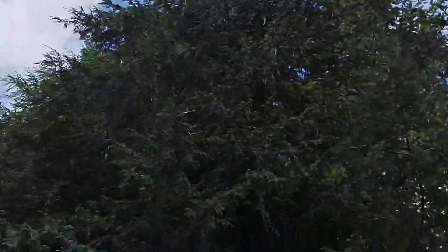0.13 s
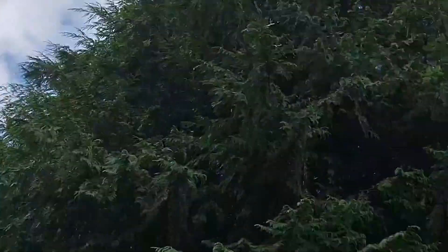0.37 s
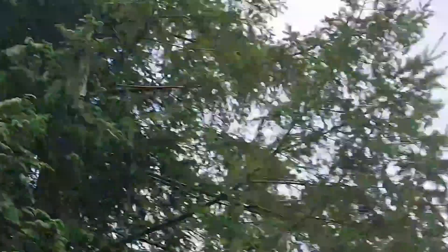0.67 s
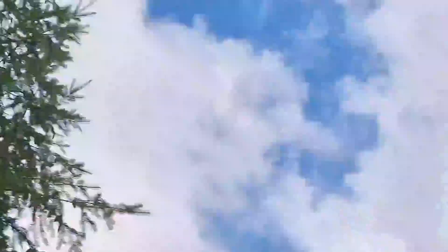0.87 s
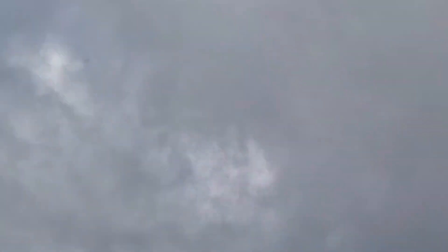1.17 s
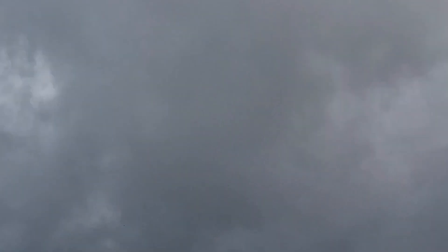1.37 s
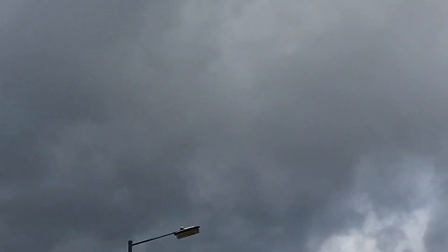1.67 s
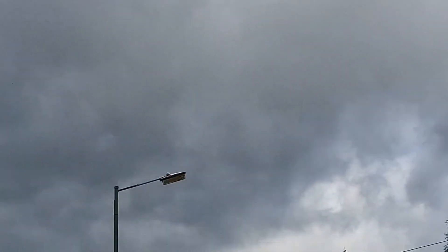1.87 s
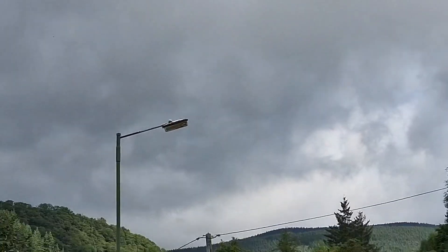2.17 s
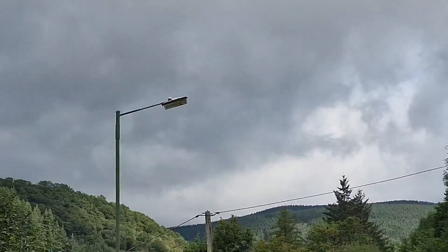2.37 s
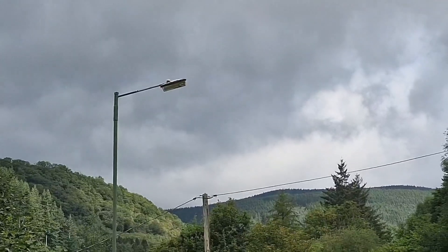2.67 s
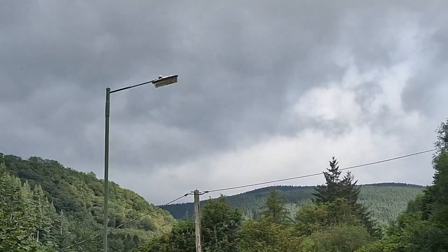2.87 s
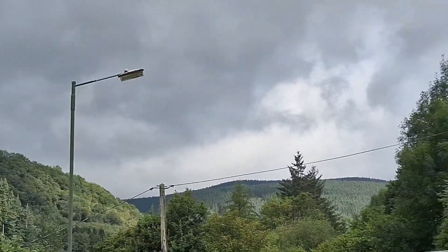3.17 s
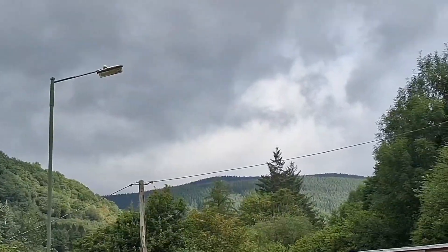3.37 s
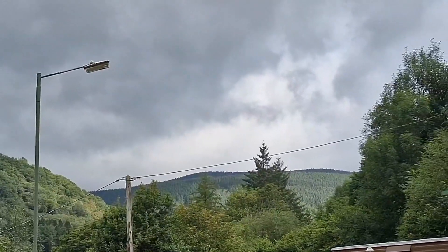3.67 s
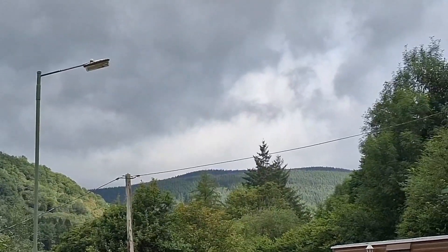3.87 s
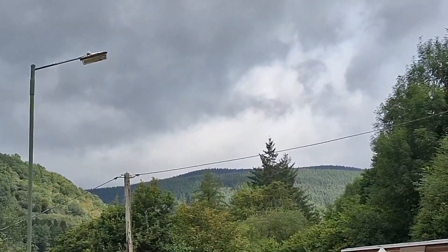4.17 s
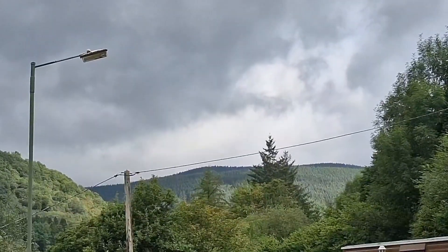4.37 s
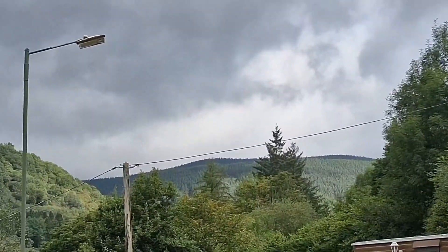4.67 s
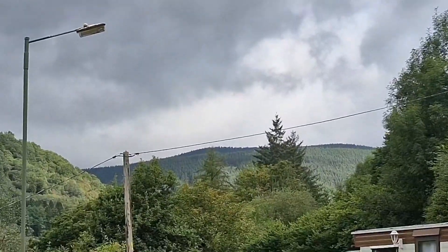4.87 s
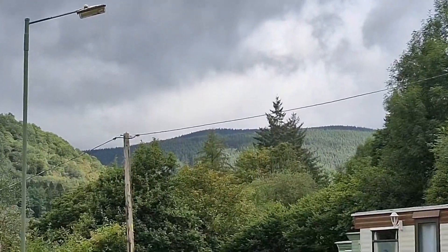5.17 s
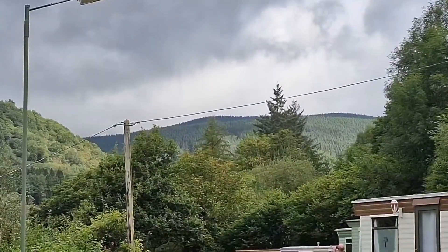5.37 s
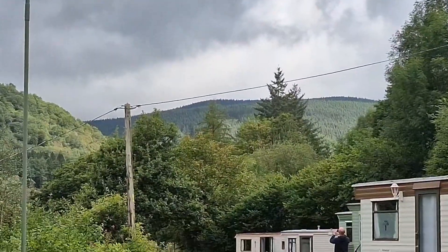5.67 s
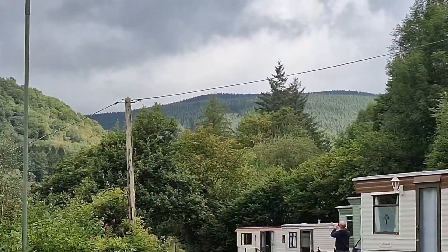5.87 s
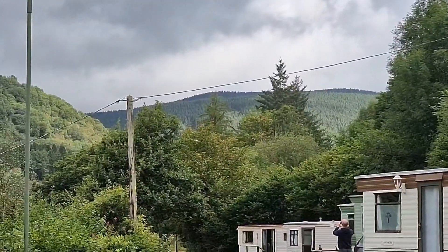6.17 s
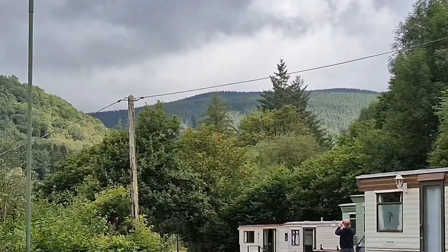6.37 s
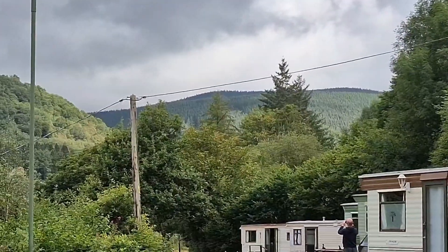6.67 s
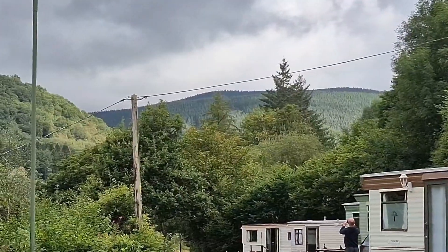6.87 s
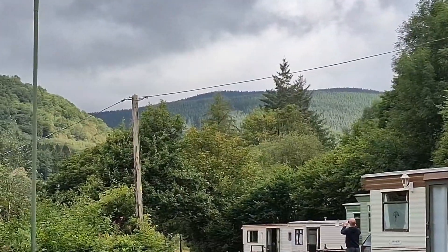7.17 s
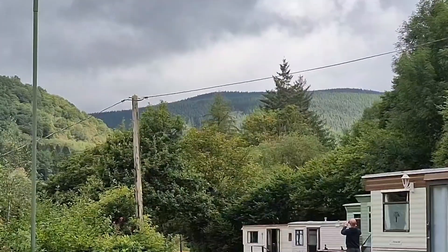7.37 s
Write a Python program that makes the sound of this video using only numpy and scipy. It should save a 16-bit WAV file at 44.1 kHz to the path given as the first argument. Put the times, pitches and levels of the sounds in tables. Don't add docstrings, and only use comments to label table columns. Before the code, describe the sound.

The jet is already almost overhead at 0 s: a huge, bright, rushing roar with hissing turbulence and dry, ripping crackle. It passes closest around 0.4 s, then its exhaust swings towards the listener and the roar becomes heavier and lower, strongest at about 1 to 1.6 s, with tearing bursts until about 2.3 s. Treble drains quickly; weak crackle remains near 2.8 to 3 s. From 3 s a deep, broad rumble rolls on, surging and lulling as hillsides throw it back, swelling slightly around 6 s and still present at the 7.5 s end. Soft microphone hiss lies underneath. A faint tick comes at 4.3 s. From about 4.8 to 7.2 s a small bird to the left gives thin, husky, falling whistles, clearest near 5.9 s, and short high chips. Slight hand rustles and ticks occur at 6.3 and 7.15 s, with the sharpest tick at far left at 7.4 s. Hand-held stereo phone outdoors.

```python
import sys
import numpy as np
from scipy import signal
from scipy.io import wavfile
from scipy.ndimage import map_coordinates

SR = 44100
rng = np.random.default_rng(int(sys.argv[2]) if len(sys.argv) > 2 else 0)


def makeup_ratio(level_db):
    decades = np.asarray(level_db, float) / 20
    return 10 ** decades


def transcribe(signal):
    frames = np.atleast_2d(signal).T
    limited = np.clip(frames, -1, 1)
    pcm = np.round(limited * 32767).astype(np.int16)
    wavfile.write(sys.argv[1], SR, pcm)


N = 331632
T = np.arange(N) / SR
FRAME = 2048
HZ = np.arange(FRAME // 2 + 1) * SR / FRAME + 1e-3
NEAREST_KM, SPEED_KM_S, NEAREST_S = 0.14, 0.2, 0.41
ASTERN_S, ASTERN_TAKES_S = 0.82, 0.094


def low(x, hz, order=1):
    return signal.sosfilt(signal.butter(order, min(hz, 0.45 * SR), fs=SR, output="sos"), x)


def high(x, hz, order=2):
    return signal.sosfilt(signal.butter(order, min(hz, 0.45 * SR), "high", fs=SR, output="sos"), x)


def ramp(t, s, takes_s):
    return 1 / (1 + np.exp(-(t - s) / takes_s))


def bump(x, centre, half):
    return np.exp(-0.5 * ((x - centre) / half) ** 2)


def delay(x, ms, order=3):
    return map_coordinates(x, [np.arange(N) - ms * SR / 1000], order=order, mode="mirror")


def colour(points):
    hz, db = np.transpose(points)
    return np.interp(np.log(HZ), np.log(hz), db)


def band_db(db, lo_hz, hi_hz):
    inside = (HZ >= lo_hz) & (HZ < hi_hz)
    return 10 * np.log10(np.sum(makeup_ratio(db[inside]) ** 2))


def frame_times():
    hop = FRAME // 4
    return np.arange(-(-N // hop) + 1) * hop / SR


def shape(x, db):
    overlap = FRAME * 3 // 4
    frames = signal.stft(x, nperseg=FRAME, noverlap=overlap)[2]
    gain = makeup_ratio(db) * np.sqrt(len(HZ))
    return signal.istft(frames * gain, nperseg=FRAME, noverlap=overlap)[1][..., :N]


def eddies(rate_hz, octaves):
    s = frame_times()
    grid = rng.standard_normal((int(11 / octaves) + 3, int(s[-1] * rate_hz) + 3))
    rows, cols = np.meshgrid(np.log2(HZ / 16 + 1) / octaves, s * rate_hz, indexing="ij")
    return map_coordinates(grid, [rows, cols], order=1)


def spikes(events, gain_db):
    out = np.zeros((2, N))
    for s, db, pan_db in events:
        out[:, min(int(s * SR), N - 1)] += makeup_ratio(db + gain_db + np.array([pan_db, -pan_db]) / 2)
    return out


def distance_km(t):
    return np.hypot(NEAREST_KM, SPEED_KM_S * (t - NEAREST_S))


def band_weights(absorb):
    centres_hz = [110, 310, 1000, 4200]
    weights = np.array([np.interp(np.log(HZ), np.log(centres_hz), row) for row in np.eye(4)]).T
    rush, hiss_end = centres_hz[2] ** absorb, centres_hz[3] ** absorb
    law = (np.maximum(HZ, centres_hz[2]) ** absorb - rush) / (hiss_end - rush)
    law = np.where(law > 1, law ** 1.45, law)
    weights[:, 3] = law
    weights[:, 2] = np.where(HZ > centres_hz[2], 1 - law, weights[:, 2])
    return weights


# pitch_hz, level_db (per Hz)
EXHAUST = [(15, -78), (25, -45.5), (43, -20), (56, -7), (119, -2), (169, -2), (246, -4), (323, -1),
           (411, -7), (524, -9.5), (2010, -17), (2490, -22.5), (4630, -31), (7940, -43), (15600, -66.5)]
# time_s, level_db
LOUDNESS = [(0, 0), (.3, 2), (.6, 2.5), (.85, 11), (1.1, 16.5), (1.6, 13.5), (2, 8.5), (2.4, 5), (3.2, 8.5),
            (4, 4), (4.9, 4), (5.3, 5.5), (5.6, 6.5), (6.05, 8.5), (6.4, 7.5), (6.9, 6.5), (7.2, 7),
            (7.52, 6.5)]
# low_hz, high_hz
ROAR_BANDS = [(60, 160), (200, 500), (700, 1800), (3500, 6500)]
# approach_db, astern_change_db, per_doubling_db, air_loss_db_per_km
BAND_LAWS = [(-35.5, -8.5, 5, 2), (-24, -1, -0.5, 0.5), (-19.5, -19.5, 3, 2), (-27, -23, 3.5, 28)]
# time_s, half_length_s, gain_db, centre_hz, half_width_octaves
SWELLS = [(0.043, 0.04, -7.5, 158, 0.22), (0.439, 0.03, 9, 101, 0.83), (0.67, 0.041, -1, 147, 0.45),
          (1.03, 0.05, -6, 265, 0.79), (1.31, 0.22, -6.5, 399, 0.28), (1.424, 0.66, 5, 5900, 0.48),
          (1.564, 0.34, 8.5, 128.7, 0.22), (1.734, 0.042, -4.5, 510, 2.6), (2.212, 0.07, 8, 250, 1.9),
          (2.358, 0.12, -0.7, 280, 3.6), (2.773, 0.073, 13.5, 146, 0.35), (2.839, 0.078, 8, 384, 0.67),
          (3.008, 0.072, 8, 760, 0.87), (3.039, 0.36, 4.5, 61.5, 0.3), (3.22, 0.15, 11.5, 109.5, 0.35),
          (3.298, 0.23, -3.5, 1216, 3.2), (3.607, 0.093, 8, 490, 1.43), (3.669, 0.21, -7.5, 120, 0.21),
          (4.467, 0.12, 2.5, 1024, 1.1), (4.517, 0.25, 10.5, 217, 0.26), (4.79, 0.12, -7, 200, 0.5),
          (5.28, 0.055, -9.5, 111, 0.49), (6.86, 0.046, 15, 232, 0.27), (6.892, 0.41, 1.5, 135.7, 0.36)]
# time_s, half_length_s, gain_db, centre_hz
SURGES = [(.05, 0.017, 0.5, 2500), (.68, 0.052, -0.5, 2500), (.1, 0.086, 1, 750), (.44, 0.026, -4.5, 1500),
          (.55, 0.073, 5, 600), (.81, 0.017, -2, 1500), (.9, .04, 2, 904), (1.0, 0.027, -1, 1500),
          (1.37, 0.016, 4, 1100), (2.7, 0.64, 0, 7040), (1.56, 0.028, 6, 2200), (1.85, .04, 4.5, 152),
          (1.96, .05, 4.5, 514), (2.26, 0.036, 2, 4000), (.3, 0.25, 2, 5070), (3.9, 0.12, -1, 280),
          (.2, .2, -2, 320), (5.08, .05, 2.5, 130), (5.55, 0.029, 3.5, 320), (5.8, .07, -3, 300),
          (5.8, 0.069, 2, 1100), (5.92, .06, 3, 60), (6.02, .06, 3, 1990), (6.12, .07, 0, 350),
          (6.31, 0.052, 3, 408), (4.75, 0.95, 1.5, 1395), (7.02, .04, 3.5, 320), (7.29, 0.051, 6.5, 320),
          (7.46, .04, -6, 106), (7.48, 0.049, 7, 320)]
SURGE_OCTAVES = 0.7
DEEP_DB, DEEP_ASTERN_DB, DEEP_PER_DOUBLING_DB = -4, 3, 2.5


def jet_spectrum():
    near, t = colour(EXHAUST), frame_times()
    km, astern = distance_km(t), ramp(t, ASTERN_S, ASTERN_TAKES_S)
    doublings = np.log2(km / NEAREST_KM)
    loud_db = np.interp(t, *np.transpose(LOUDNESS))
    bend = []
    for (db, aft_db, far_db, air_db), band in zip(BAND_LAWS, ROAR_BANDS):
        level_db = loud_db + db + aft_db * astern + far_db * doublings - air_db * km
        bend.append(level_db - band_db(near, *band))
    deep_db = DEEP_DB + DEEP_ASTERN_DB * astern + DEEP_PER_DOUBLING_DB * doublings
    deep = np.outer(np.clip(np.log2(90 / HZ), 0, 1.5), deep_db)
    events = list(SWELLS) + [(*row, SURGE_OCTAVES) for row in SURGES]
    s, half_s, db, hz, octaves = np.transpose(events)
    swells = db * bump(np.log2(HZ[:, None] / hz), 0, octaves) @ bump(t[:, None], s, half_s).T
    bass = 1 / (1 + (HZ[:, None] / 500) ** 2)
    mottle = 1.2 * bass * eddies(4.0, octaves=0.5) + 1.1 * (1 - bass) * eddies(25.0, octaves=3.0)
    return near[:, None] + band_weights(absorb=0.39) @ np.array(bend) + deep + swells + mottle


# centre_hz, width_hz, gain_db
VALLEY = [(115, 32, 3), (165, 55, -5.5), (305, 55, 4)]
VALLEY_OPEN, VALLEY_HIDDEN, HIDDEN_S, HIDDEN_TAKES_S = 0.18, 1.58, 4.85, 0.2
GROUND_MS, GROUND_SHARE = 10.6, 0.72
OVERHEAD_S, SINKS_S = -0.17, 1.816
LAG_BEFORE_MS, LAG_AFTER_MS, TURN_S, TURN_TAKES_S = 0.16, -0.34, 0.72, 0.19
PAN_BEFORE_DB, PAN_AFTER_DB, PAN_DB_PER_S, WASH_DB = 0.5, 0.6, 0.06, -2.5


def add_ground(x, echo, echo_ms):
    return (x + echo * low(delay(x, echo_ms, order=1), hz=2500)) / np.sqrt(1 + echo ** 2)


def jet():
    height = 1 / np.hypot(1, (T - OVERHEAD_S) / SINKS_S)
    echo_ms, echo = GROUND_MS * height, np.clip(GROUND_SHARE * height, 0, 1)
    turned = ramp(T, TURN_S, TURN_TAKES_S)
    lag_ms = LAG_BEFORE_MS + (LAG_AFTER_MS - LAG_BEFORE_MS) * turned
    pan_db = PAN_BEFORE_DB + (PAN_AFTER_DB - PAN_BEFORE_DB) * turned + PAN_DB_PER_S * T
    hidden = VALLEY_OPEN + (VALLEY_HIDDEN - VALLEY_OPEN) * ramp(frame_times(), HIDDEN_S, HIDDEN_TAKES_S)
    valley = sum(db / (1 + (2 * (HZ - hz) / width) ** 2) for hz, width, db in VALLEY)
    spectrum = jet_spectrum() + np.outer(valley, hidden)
    ray, mid, side = shape(rng.standard_normal((3, N)), spectrum)
    ray = add_ground(ray, echo, echo_ms)
    mid = add_ground(mid, 0.7 * echo, echo_ms)
    ports = np.array([delay(ray, lag_ms / 2), delay(ray, -lag_ms / 2)])
    side = high(side, hz=650) + 0.16 * side + 0.4 * low(side, hz=35)
    wash = (mid + side * np.array([[1], [-1]])) * makeup_ratio(WASH_DB)
    both = (ports + wash) / np.sqrt(1 + makeup_ratio(WASH_DB) ** 2)
    treble = both - low(both, hz=3000)
    shade_db = np.array([pan_db, -pan_db]) / 2
    return both * makeup_ratio(shade_db) + treble * (makeup_ratio(2.5 * shade_db) - 1)


# time_s, peak_db, left_minus_right_db
SHOCKS = [(0.0318, -26.5, -0.5), (0.0328, -21, -2.5), (0.0598, -33.5, 3.5), (0.3202, -30.5, 8),
          (0.5127, -23, 0.5), (0.5766, -24.5, -7.5), (0.6818, -27, -2.5), (1.0879, -35, -13.5),
          (1.2136, -31, 0), (1.3673, -26, 3.5), (1.3927, -36.5, -8), (1.5309, -33.5, 10.5),
          (1.5309, -41, 18), (1.5436, -33.5, -8), (1.562, -22.5, 6.5), (1.7878, -51, 0), (1.8485, -40, -9),
          (2.203, -57, 3), (2.2428, -46.5, 6.5), (2.7717, -51.5, -8), (3.681, -63, 7)]
# time_s, half_length_s, gain_db
BURSTS = [(0.058, 0.023, 9.5), (0.193, 0.041, 8.5), (0.343, .03, 4.5), (0.518, 0.033, 14.5),
          (.585, 0.029, 7.5), (0.685, 0.0081, 11.5), (.79, .02, 4.5), (0.915, 0.052, 10), (1.116, 0.049, 9),
          (1.21, 0.039, 5.5), (1.28, .02, 7), (1.387, 0.046, 13.5), (1.555, 0.038, 15),
          (1.653, 0.047, 16.5), (1.86, 0.065, 8.5), (1.99, .06, 12.5), (2.255, 0.066, 20),
          (2.802, 0.093, 15), (3.02, .1, 15)]
TEAR_DB, TEAR_ASTERN_DB, TEAR_DB_PER_KM = -53.5, 1, 104.5


def crackle():
    tear_db = TEAR_DB + TEAR_ASTERN_DB * ramp(T, ASTERN_S, ASTERN_TAKES_S)
    tear_db = tear_db - TEAR_DB_PER_KM * (distance_km(T) - NEAREST_KM)
    tear_db = tear_db + sum(gain_db * bump(T, s, half_s) for s, half_s, gain_db in BURSTS)
    struck = rng.random((2, N)) < 5000 / SR
    sign = np.sign(rng.standard_normal((2, N)))
    small = struck * sign * makeup_ratio(2.0 * rng.exponential(size=(2, N)))
    small = small / small.std() * makeup_ratio(tear_db + 11.0)
    big = spikes(SHOCKS, gain_db=12.5)
    decay = np.exp(-np.arange(400) / 60.0)[None]
    tail = 0.5 * rng.standard_normal((2, N)) * signal.fftconvolve(big, decay, axes=1)[:, :N]
    return high(2 * low(small + big + tail, hz=7500, order=2), hz=4470)


# pitch_hz, level_db (per Hz)
HISS = [(4000, -5), (7000, -4), (8900, -3), (9600, 0), (13000, 0), (15600, 1)]
# time_s, level_db
HISS_DB = [(2.3, -82.5), (2.9, -86), (3.3, -95), (4.2, -99), (5.2, -93.5), (7.52, -92.5)]
# time_s, half_length_s, gain_db
RUSTLES = [
    (6.27, 0.023, 4),
    (7.156, .03, 2.5),
    (7.427, 0.044, 9.5),
]


def hiss():
    t, tone = frame_times(), colour(HISS)
    tone = tone - band_db(tone, 9000, 15000)
    level_db = np.interp(t, *np.transpose(HISS_DB)) + 10.0
    rustle_db = sum(gain_db * bump(t, s, half_s) for s, half_s, gain_db in RUSTLES)
    return shape(rng.standard_normal((2, N)), tone[:, None] + level_db + rustle_db)


# time_s, peak_db, left_minus_right_db
TICKS = [
    (4.3178, -71.5, 8),
    (6.2619, -72.5, -6),
    (7.1466, -66, 4),
    (7.396, -51, 17),
    (7.4046, -63, 5.5),
]


def ticks():
    t = np.arange(900) / SR
    ring = np.sin(2 * np.pi * 7700 * t) * np.exp(-t / 0.0014)
    rasp = 0.39 * rng.standard_normal(len(t)) * np.exp(-t / 0.0025)
    rasp = rasp - low(rasp, hz=4000, order=2)
    return signal.fftconvolve(spikes(TICKS, gain_db=5.0), (ring + rasp)[None], axes=1)[:, :N]


# start_s, length_s, first_hz, last_hz, level_db
BIRD = [
    (4.75, .06, 7500, 7300, -89),
    (5.35, .12, 6850, 6650, -77.5),
    (5.62, .11, 6850, 6400, -86),
    (5.743, 0.1, 7100, 6730, -78),
    (5.93, .13, 7200, 6400, -74.5),
    (6.13, .14, 7100, 6550, -78),
    (6.459, .06, 7650, 7450, -78),
    (6.9, .07, 8100, 7800, -77.5),
    (6.968, .06, 8040, 7930, -83),
    (7.138, .08, 7500, 7300, -82),
]


def bird():
    out = np.zeros(N)
    for start_s, length_s, first_hz, last_hz, level_db in BIRD:
        u = np.clip((T - start_s) / length_s, 0, 1)
        pitch_hz = first_hz + (last_hz - first_hz) * u ** 1.6
        swell = np.sin(np.pi * u ** 0.6)
        out += makeup_ratio(level_db) * swell * np.sin(2 * np.pi * np.cumsum(pitch_hz) / SR)
    out *= 1.2 + 5.0 * low(rng.standard_normal(N), hz=250)
    tail = rng.standard_normal(4000) * np.exp(-np.arange(4000) / 1200.0)
    trees = 0.025 * signal.fftconvolve(out, tail)[:N]
    return (out + trees) * makeup_ratio(np.array([[3.0], [-3.0]]))


def scene():
    return makeup_ratio(0.47) * jet() + crackle() + hiss() + ticks() + bird()


def top_cut(x):
    return signal.sosfilt(signal.butter(12, 15740, fs=SR, output="sos"), x)


# pitch_hz, gain_db
MIC = [(5000, 1), (6500, -2), (8300, 0), (8900, -2.5), (9400, -5.5), (12000, -2), (15500, -4.5)]
# pitch_hz, threshold_spreads
STARVED = [(4500, 3.2), (5800, 1.5), (6500, 1.1), (8500, 1.3), (9200, 0.6), (13500, 0.5), (15500, 0.0)]


def record(dry):
    rare = eddies(32.0, octaves=0.035) * 1.4 > colour(STARVED)[:, None]
    dropped = rare & (HZ[:, None] > 4500)
    heard = shape(dry, colour(MIC)[:, None] - 22.0 * dropped - 10 * np.log10(len(HZ)))
    held = heard / (1 + np.abs(heard) ** 8) ** (1 / 8)
    return top_cut(held)


dry = scene()
out = record(dry)
transcribe(out)
```